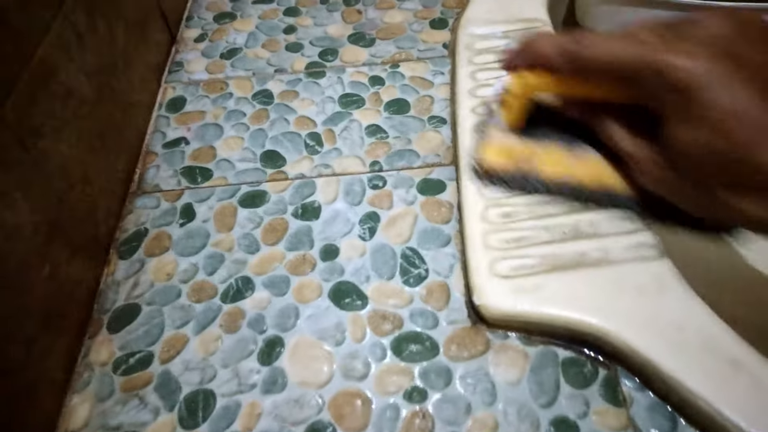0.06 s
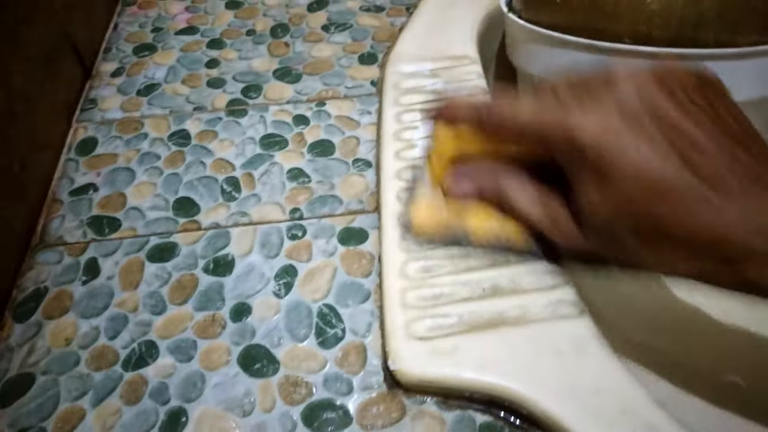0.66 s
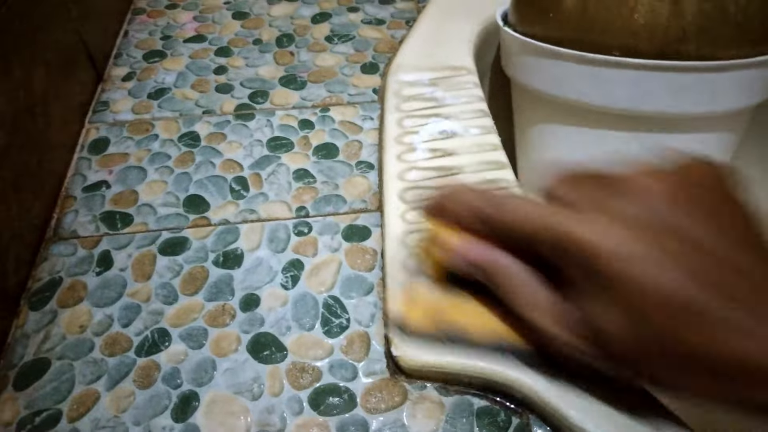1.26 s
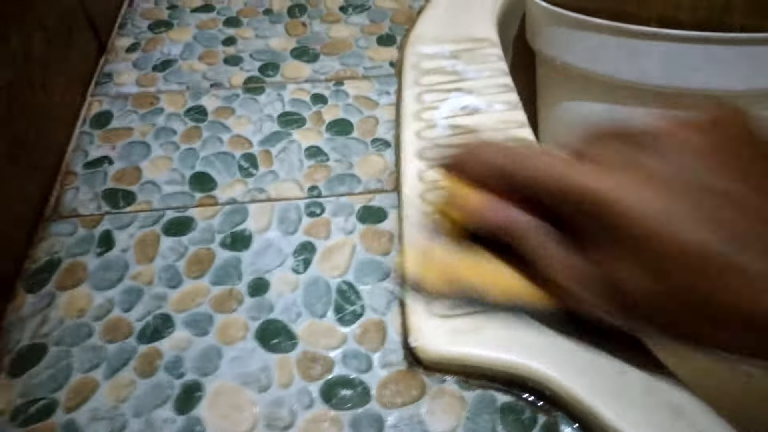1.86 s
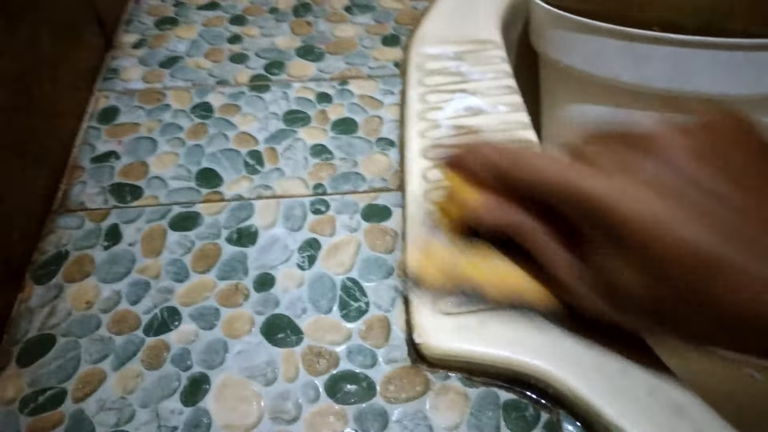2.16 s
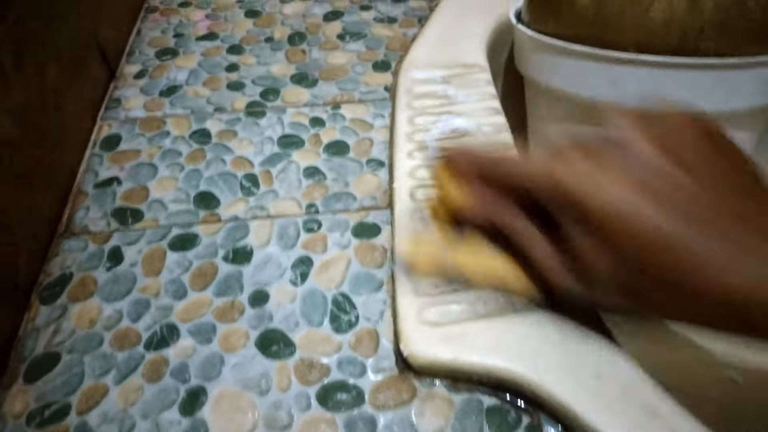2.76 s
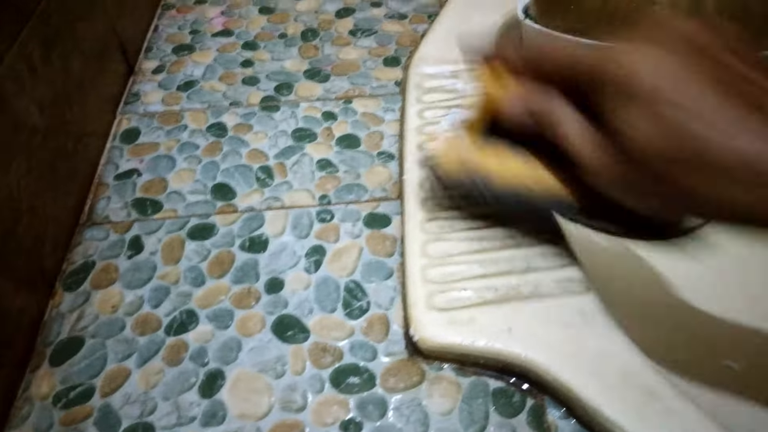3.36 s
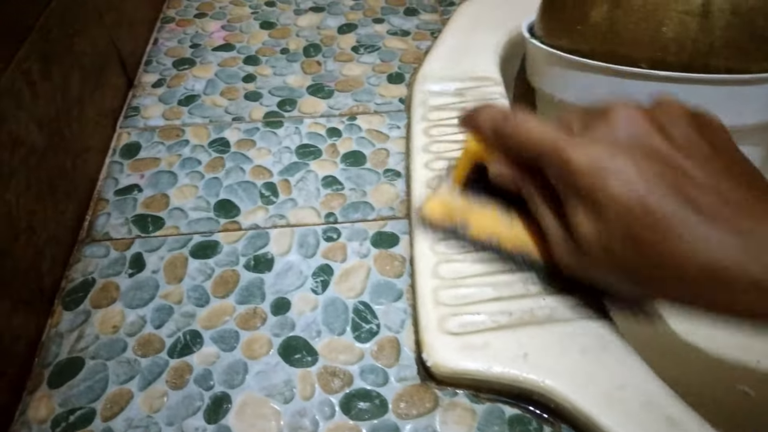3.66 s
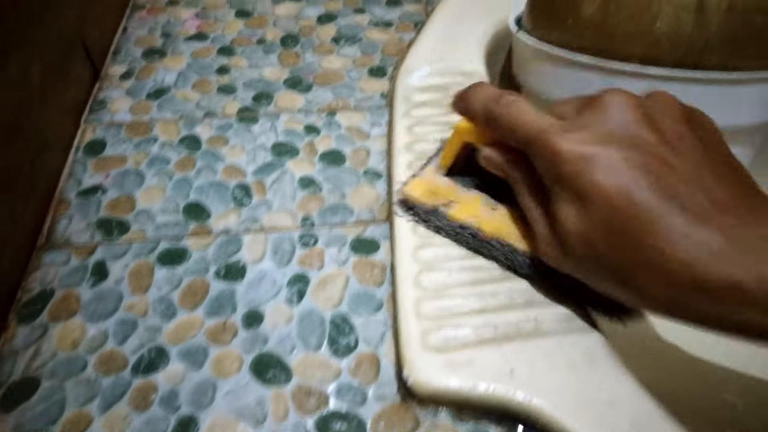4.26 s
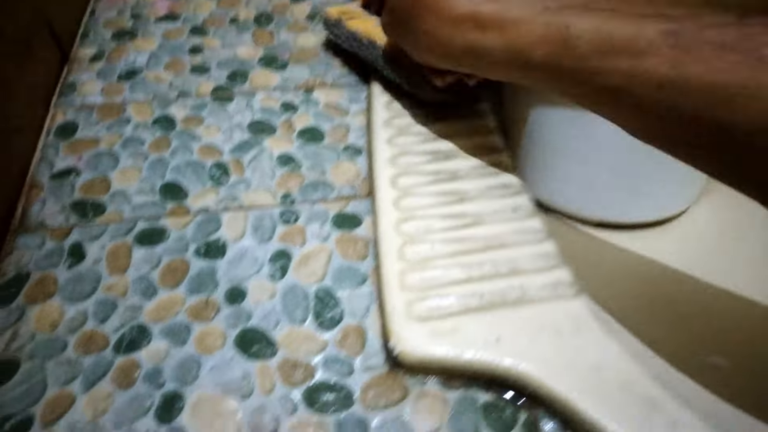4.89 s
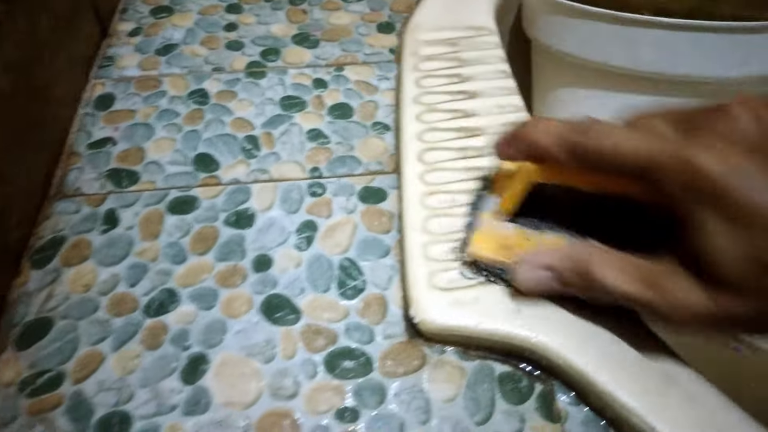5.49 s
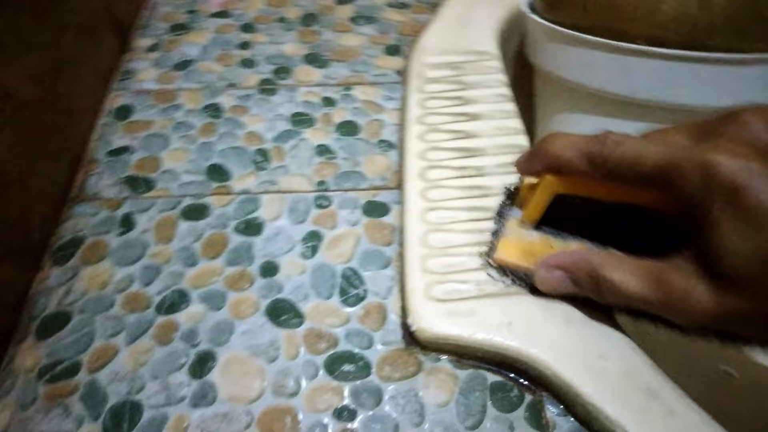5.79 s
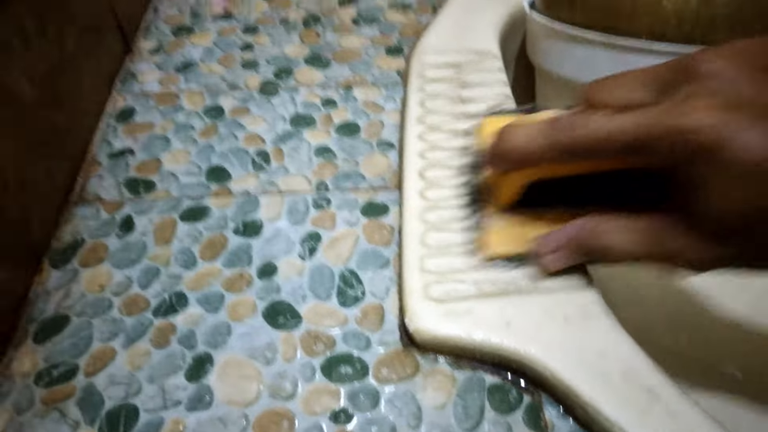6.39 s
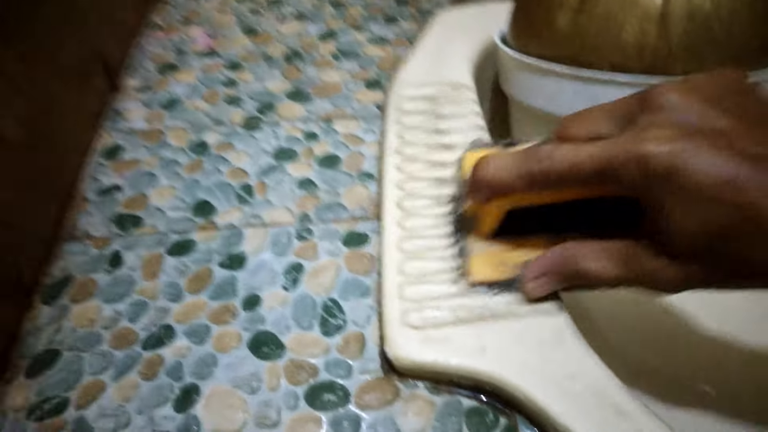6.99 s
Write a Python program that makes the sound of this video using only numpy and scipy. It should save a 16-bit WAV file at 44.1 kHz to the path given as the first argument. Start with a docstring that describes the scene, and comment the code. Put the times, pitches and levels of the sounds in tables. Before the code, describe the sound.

A stiff brush scrubs wet ribbed ceramic in fast, rasping strokes, with a few plastic knocks and two brief pauses in a small tiled room.

```python
"""A small tiled toilet room, heard from close by on a hand-held stereo microphone.
A stiff hand brush scrubs the wet, ribbed footrest of a ceramic squat pan, about seven strokes a second,
its bristles flicking over the grit in a dense rasp. The plastic block knocks on the ceramic, and stick
and slip make the hollow pan drone. Twice the brush eases off and lands again.
The tiles ring briefly, and a low hum and rumble lie under it all."""
import sys
import numpy as np
from scipy import signal
from scipy.fft import rfft, irfft
from scipy.io import wavfile
from scipy.ndimage import uniform_filter1d

SR = 44100
rng = np.random.default_rng(int(sys.argv[2]) if len(sys.argv) > 2 else 0)


def store_wav(level_fs):
    """Save 16-bit WAV to argv[1]."""
    pcm = np.round(np.clip(np.atleast_2d(level_fs), -1, 1) * 32767)
    wavfile.write(sys.argv[1], SR, pcm.T.astype(np.int16))


N = 310464
TIME, FREQ = np.arange(N) / SR, np.fft.rfftfreq(N, 1 / SR)

# spectrum of the room tone: pitch_hz, level_db
ROOM_TONE = [(15, -0.5), (28, 6.5), (40, -15), (62, 0), (85, -14), (130, -17), (250, -23.5), (500, -24.5),
             (1200, -32), (4000, -83), (14000, -28.5)]
# how alike the room tone is left and right: pitch_hz, likeness (0-1)
STEREO_LIKENESS = [(60, 0.88), (200, 0.93), (350, 1), (600, 0), (3000, 0.16)]
# the rumble swells and sinks: time_s, level_db
RUMBLE_LEVELS = [(0, -54), (.5, -41.5), (1, -45.5), (1.53, -36), (2.2, -40), (3.7, -42.5), (4.5, -42.5),
                 (7.04, -45.5)]
# partials of the hum: pitch_hz, level_db
HUM_PARTIALS = [(55.5, -49.5), (109.4, -54.5), (221, -68.5)]
# push and pull in turn, each lasting until the next: start_s, level_db
STROKES = [(-.06, -37), (.086, -36.5), (.27, -37), (.435, -37.5), (.618, -36), (.778, -36.5), (.944, -35.5),
           (1.094, -35), (1.252, -36), (1.417, -34), (1.563, -33), (1.713, -33), (1.859, -31),
           (2.007, -32.5), (2.162, -31), (2.301, -32.5), (2.452, -33), (2.599, -32), (2.749, -33.5),
           (2.882, -33.5), (3.007, -34.5), (3.164, -33.5), (3.326, -49), (3.558, -38), (3.707, -37),
           (3.867, -37), (4.017, -36), (4.178, -36.5), (4.328, -36.5), (4.485, -37), (4.645, -42),
           (4.795, -52), (4.985, -32), (5.23, -35), (5.372, -35.5), (5.561, -34), (5.705, -33.5),
           (5.854, -33.5), (5.998, -31), (6.15, -30.5), (6.289, -30), (6.43, -30.5), (6.582, -30),
           (6.736, -30.5), (6.886, -30.5), (7.029, -31.5)]
# how the brush is held: start_s, crest (place of top speed in a stroke, 0-1), sharpness (of the swell),
# body_db, rasp_db, fizz_db, push_db (rasp that a push gains and a pull loses)
GRIPS = [(-.2, 0.54, 1.5, 3.5, -2, 2.5, -1), (3.3, 0.14, 1.8, 3, 0.5, -4.5, 2.5),
         (3.5, 0.62, 0.8, 0.8, -3, 3, 0), (4.7, 0.24, 2, 8, 3.5, 2, -1), (4.95, 0.65, 1.2, 1.5, -3, 1.5, 1),
         (5.3, 0.57, 1.6, 1.5, -3.5, 2.5, .5), (5.95, .62, 1.6, -0.5, -4.5, 1.2, 2)]
# bristle spectrum at the left and right of the microphone: pitch_hz, level_db
BRISTLES_LEFT = [(100, -24), (300, -17.5), (600, -19), (1000, -13), (1450, -11), (2000, -3), (2500, -1),
                 (3100, -2.5), (4600, -1.4), (7500, -1.5), (11000, -1), (14000, 0)]
BRISTLES_RIGHT = [(100, -16), (300, -12), (600, -13.5), (1280, -11.5), (1600, -2.5), (2500, 1.9),
                  (3200, .5), (4200, 4), (5300, 4.5), (6600, 0), (8700, -4.5), (10200, -9.5),
                  (13000, -11.5), (14200, -12)]
# how body, rasp, scrape, hiss and fizz follow the arm: pitch_hz, speed_power, turn_db, slap_db
BRISTLE_BANDS = [(930, 0.16, -2.5, 7.5), (1810, 0.18, -7, 4.5), (3200, 0.28, -4.5, 3), (5100, 0.3, -7, 1),
                 (9600, 0.52, -9, -1)]
# the plastic block hits the ceramic: start_s, low_ring_db, click_db
KNOCKS = [(.337, -46, -37.5), (0.6428, -38.5, -18.5), (2.464, -47.5, -40), (2.98, -37.5, -43),
          (4.455, -44, -43), (4.816, -46.5, -48.5), (4.931, -41, -30), (6.0716, -38, -41)]
# the ring of the block: pitch_hz, level_db, t60_s
BLOCK_MODES = [(470, 0.5, 0.097), (629, 1.5, 0.076), (800, 8, 0.032), (878, -4, 0.15), (1116, -3.5, 0.068),
               (1380, -3.5, 0.11), (2150, -5, 0.026), (2650, -4, .01), (3250, 4.5, 0.018),
               (3550, -1, 0.022), (4280, 1, 0.024), (4750, -11, .02), (5410, -6, .012)]
# the brush judders on the pan: start_s, length_s, level_db
JUDDERS = [(0.794, .06, -48.5), (1.764, 0.2, -47), (2.538, 0.037, -45.5), (3.245, 0.053, -41.5),
           (3.42, 0.17, -53.5), (3.86, 0.14, -47.5), (4.267, 0.055, -41), (4.477, 0.048, -37),
           (4.63, 0.082, -42), (4.977, 0.23, -51.5), (5.582, 0.065, -40), (6.29, .13, -40.5),
           (6.665, 0.044, -42.5), (6.776, .16, -50)]
# resonances of the hollow pan: pitch_hz, width_hz, level_db
PAN_MODES = [(159, 30, -7.5), (223, 20, 1), (251, 52, -5), (340, 46, -7), (438, 33, -13)]
# the bristle pad slaps down or catches a rib: start_s, level_db, fade_s
SLAPS = [(3.44, -42, 0.018), (3.541, -37, 0.015), (3.815, -35, 0.041), (4.11, -36, 0.055),
         (4.44, -30.5, 0.034), (4.813, -45, 0.0073), (4.928, -30, 0.04), (5.06, -29, 0.028)]
# how long the tiled room rings: pitch_hz, t60_s
ROOM_DECAY = [(150, 0.55), (1000, 0.4), (4000, 0.16), (8000, 0.39), (14000, 0.16)]


def amp(db):
    """Decibels to gain."""
    return 10 ** (np.asarray(db) / 20)


def unit(x):
    """Scales to rms 1."""
    return x / np.sqrt(np.mean(x ** 2) + 1e-20)


def curve(points, hz):
    """Reads (pitch_hz, value) points on a log-frequency axis."""
    pitches, values = np.transpose(points)
    return np.interp(np.log(hz + 1), np.log(pitches), values)


def drift(hz):
    """Slow random wander of rms 1, mostly below hz."""
    return unit(irfft(rfft(rng.standard_normal(N)) / (1 + (FREQ / hz) ** 4), N))


def add(mix, start_s, sound):
    """Mixes a sound in at start_s."""
    part = mix[..., round(start_s * SR):][..., :sound.shape[-1]]
    part += sound[..., :part.shape[-1]]


def rumble(level_db=3.0, flutter_db=-0.04):
    """Room tone: the lows swell and sink under a steady faint hiss."""
    left, other = rfft(rng.standard_normal((2, N)))
    likeness = curve(STEREO_LIKENESS, FREQ)
    right = likeness * left + np.sqrt(1 - likeness ** 2) * other
    tone = np.array([left, right]) * unit(amp(curve(ROOM_TONE, FREQ)))
    lows = 1 / (1 + (FREQ / 100) ** 4)
    times, db = np.transpose(RUMBLE_LEVELS)
    swell = amp(np.interp(TIME, times, db) + flutter_db * drift(3.6))
    steady = irfft(tone * (1 - lows), N) * amp(np.mean(db))
    return amp(level_db) * (irfft(tone * lows, N) * swell + steady)


def hum(waver_db=2, wander_hz=1.0):
    """A low hum, dead centre, each partial wavering in level and pitch."""
    out = np.zeros(N)
    for hz, db in HUM_PARTIALS:
        level = amp(db + waver_db * drift(3.4)) * np.sqrt(2)
        cycles = np.cumsum(hz + wander_hz * drift(3.64)) / SR
        out += level * np.sin(2 * np.pi * cycles)
    return out


def strokes(usual_db=-34):
    """Grip, direction and force set the shape and colour of each stroke."""
    starts, db = np.transpose(STROKES)
    grip = np.maximum(np.searchsorted(np.transpose(GRIPS)[0], starts) - 1, 0)
    _, crest, sharpness, body_db, rasp_db, fizz_db, push_db = np.array(GRIPS)[grip].T
    direction = (-1) ** np.arange(len(starts))
    # ahead of a lighter stroke, the arm peaks earlier and fades faster
    easing_db = np.maximum(-np.diff(db, append=db[-1]), 0)
    shape = crest - 0.035 * easing_db, sharpness + 0.029 * easing_db
    # body, rasp and fizz grow less than the force does
    harder_db = db - usual_db
    colour = (body_db - 0.28 * harder_db,
              rasp_db + direction * push_db - 0.13 * harder_db,
              fizz_db - 0.24 * np.maximum(harder_db, 0))
    return shape, colour


def arm(shape, colour_db, power, turn_db, bent_limit_db=-36.0):
    """Each stroke speeds up and stops; at the turn the bent bristles still scratch, up to a limit."""
    starts, db = np.transpose(STROKES)
    crest, sharpness = shape
    progress = np.interp(TIME, starts, np.arange(len(starts)))
    stroke = progress.astype(int)
    warp = np.log(.5) / np.log(np.clip(crest[stroke], .1, .9))  # puts top speed at the crest
    speed = np.abs(np.sin(np.pi * (progress % 1) ** warp))
    sweep = amp(db + colour_db)[stroke] * speed ** abs(power * sharpness[stroke])
    middles = starts + np.append(np.diff(starts), 0) / 2
    scratch_db = np.interp(TIME, middles, np.minimum(db, bent_limit_db) + colour_db) + turn_db
    return np.hypot(sweep, amp(scratch_db))


def flicks(per_s=16000, spread_db=1.5, scatter_s=0.00049, tufts=32):
    """Bristles snap free one by one; each tuft reaches the microphone by its own short paths."""
    sizes = amp(spread_db * np.minimum(rng.exponential(1, N), 5))
    snaps = sizes * (rng.random(N) < per_s / SR) * rng.choice([-1, 1], N)
    tuft = rng.integers(0, tufts, N)
    t = TIME[:128]
    paths = rfft(rng.standard_normal((tufts, 2, len(t))) * np.exp(-t / scatter_s))
    paths = irfft(paths / np.sqrt(np.mean(abs(paths) ** 2, axis=0)))  # together they cover all pitches
    arrivals = (signal.oaconvolve((snaps * (tuft == k))[None], paths[k], axes=1) for k in range(tufts))
    return unit(sum(arrivals)[:, :N])


def flex(x, depth_db=2.0, frames=36):
    """The tufts bend as they cross the ribs, so their narrow resonances come and go."""
    spectra = signal.stft(x, SR, nperseg=256)[2]
    peaks = uniform_filter1d(rng.standard_normal(spectra.shape), frames, axis=2)
    peaks = uniform_filter1d(peaks, frames // 2, axis=2)
    peaks = unit(uniform_filter1d(peaks, 2, axis=1))
    return unit(signal.istft(spectra * amp(depth_db * peaks), SR, nperseg=256)[1][:, :N])


def bristles(level_db=5.0, clump_db=0.5, ring_hz=4400, ring_width_hz=300, ring_db=-1):
    """Fast bristles fizz; the lower rasp and the body of the brush follow the stroke less."""
    shape, (body_db, rasp_db, fizz_db) = strokes()
    at_microphone = unit(amp([curve(BRISTLES_LEFT, FREQ), curve(BRISTLES_RIGHT, FREQ)]))
    grit = rfft(flex(flicks()) * amp(clump_db * drift(43))) * at_microphone
    slap = slaps()
    block_ring = irfft(grit / (1 + 2j * (FREQ - ring_hz) / ring_width_hz), N)
    out = amp(ring_db) * slap * block_ring
    scrape_db = 0.42 * rasp_db + 0.56
    colours = [body_db, rasp_db, scrape_db, 0, fizz_db]
    centres = np.transpose(BRISTLE_BANDS)[0]
    for colour_db, (hz, power, turn_db, slap_db) in zip(colours, BRISTLE_BANDS):
        band = curve(list(zip(centres, centres == hz)), FREQ)  # fades out toward its neighbours
        level = np.hypot(arm(shape, colour_db, power, turn_db), amp(slap_db) * slap)
        out += irfft(grit * band, N) * level
    return amp(level_db) * out


def knocks(split_hz=1800, left_db=-4, contact_s=0.0006):
    """Right of centre, a soft blow rings the low modes of the block, a hard edge the high ones."""
    out, t = np.zeros((2, N)), TIME[:SR // 4]
    press = 1 - np.exp(-t / contact_s)  # the plastic gives a little as it lands
    for start_s, low_ring_db, click_db in KNOCKS:
        for hz, db, t60_s in BLOCK_MODES:
            blow_db = low_ring_db if hz < split_hz else click_db
            phase = rng.uniform(-0.67, 1, (2, 1)) * min(hz / 1000, 2)  # one for each channel
            ring = np.exp(-np.log(1000) * t / t60_s) * np.sin(2 * np.pi * hz * t + phase)
            add(out, start_s, amp(blow_db + db) * press * ring)
    return out * amp([[left_db], [0]])


def shaking(rise_s=0.028, fade_s=0.07, slap_db=-19, knock_db=-11):
    """Force on the pan: a judder builds, holds and dies away; slaps and knocks stir it a little too."""
    force = amp(slap_db) * slaps()
    for start_s, length_s, db in JUDDERS:
        age = TIME - start_s
        fade = np.exp(-np.maximum(age - length_s, 0) / fade_s)
        force = np.hypot(force, amp(db) * np.clip(age / rise_s, 0, 1) * fade)
    for start_s, low_ring_db, _ in KNOCKS:
        age = TIME - start_s
        force = np.hypot(force, amp(low_ring_db + knock_db) * (age > 0) * np.exp(-abs(age) / fade_s))
    return force


def judders(level_db=-1.0, stereo_width=0.23):
    """Uneven stick and slip shakes the low modes of the hollow pan."""
    pan = sum(amp(db) / (1 + ((FREQ - hz) / (width_hz / 2)) ** 2) for hz, width_hz, db in PAN_MODES)
    mid, side = irfft(rfft(rng.standard_normal((2, N))) * pan, N)
    drone = unit(np.array([mid + stereo_width * side, mid - stereo_width * side]))
    return amp(level_db) * shaking() * drone


def slaps(rise_s=0.0083):
    """The force of many bristles landing together and settling."""
    force = np.zeros(N)
    for start_s, db, fade_s in SLAPS:
        age = np.maximum(TIME - start_s + rise_s, 0)
        force += amp(db) * (1 - np.exp(-(age / rise_s) ** 2)) * np.exp(-age / fade_s)
    return force


def tiled_room(x, wet_db=-10, first_echo_s=0.0037):
    """Dense reflections off near tiles, the lows lasting longest; the pattern shifts as the hand moves."""
    hz, t, spectra = signal.stft(rng.standard_normal((2, 2, SR // 2)), SR, nperseg=256)
    decay = np.exp(-np.log(1000) * t / curve(ROOM_DECAY, hz)[:, None])
    tails = signal.istft(spectra * decay, SR, nperseg=256)[1]
    tails *= TIME[:tails.shape[-1]] > first_echo_s
    sways = np.cos(2 * np.pi * TIME), np.sin(2 * np.pi * TIME)  # between two patterns, once a second
    wet = sum(signal.fftconvolve(x * sway, tail / np.linalg.norm(tail[0]), axes=1)[:, :N]
              for sway, tail in zip(sways, tails))
    return x + amp(wet_db) * wet


def scene():
    """At the microphone: the brush and its reflections, the droning pan, rumble and hum."""
    return tiled_room(bristles() + knocks()) + judders() + rumble() + hum()


def record(dry):
    """The recorder cuts the treble above 14.29 kHz."""
    lowpass = signal.firwin(1023, 14290, window=("kaiser", 8), fs=SR)
    return signal.oaconvolve(dry, lowpass[None], "same")


dry = scene()
out = record(dry)
store_wav(out)
```